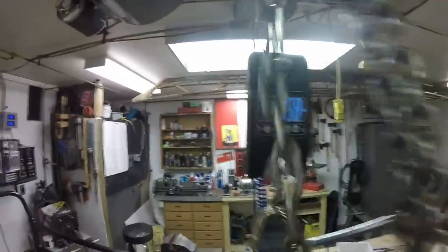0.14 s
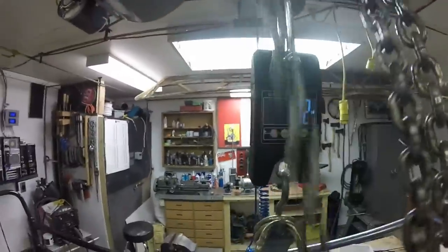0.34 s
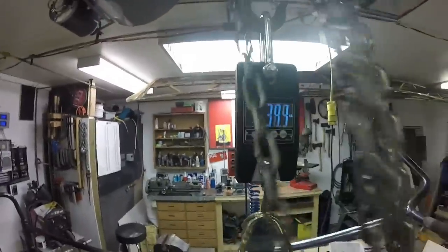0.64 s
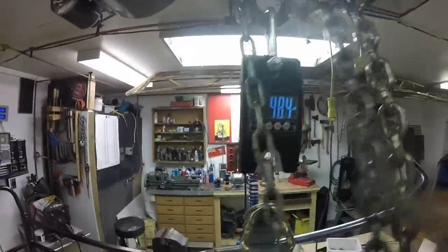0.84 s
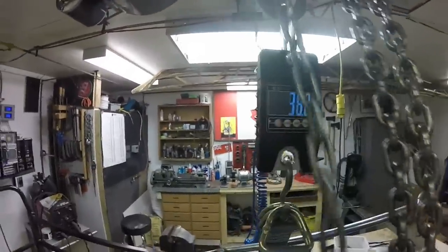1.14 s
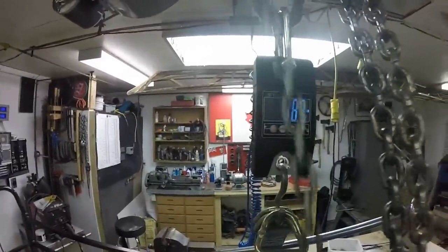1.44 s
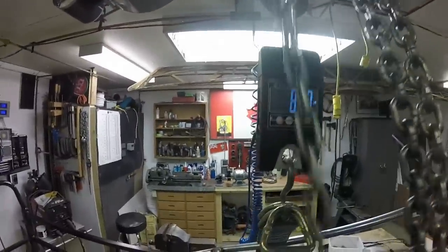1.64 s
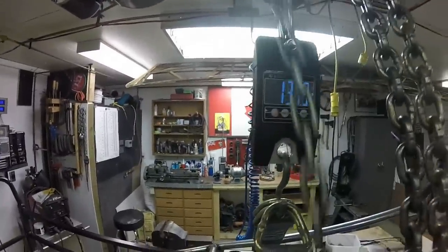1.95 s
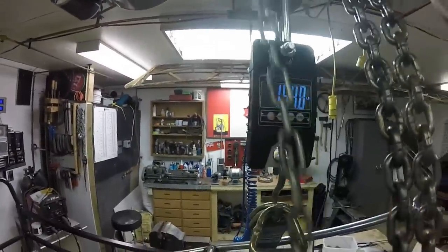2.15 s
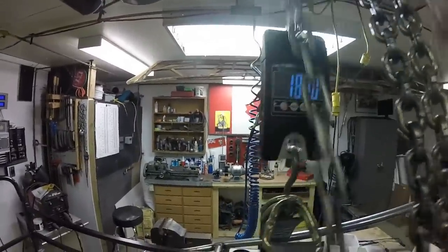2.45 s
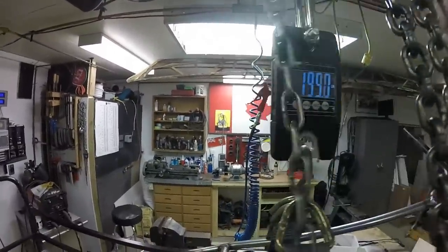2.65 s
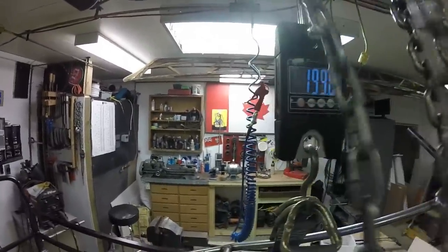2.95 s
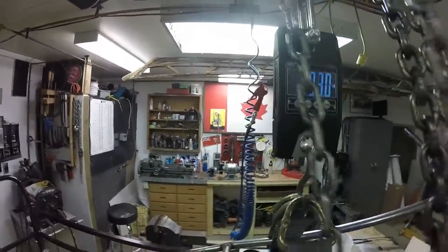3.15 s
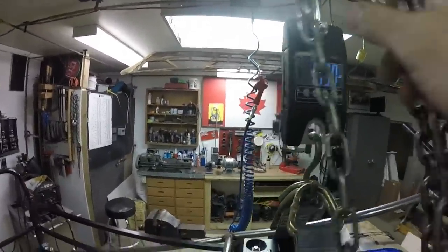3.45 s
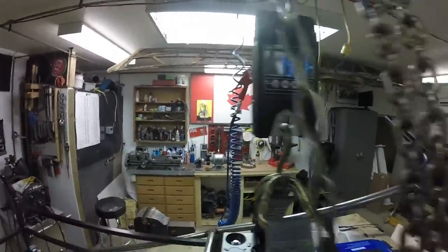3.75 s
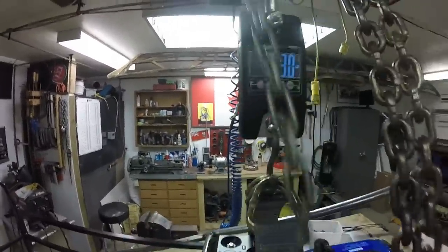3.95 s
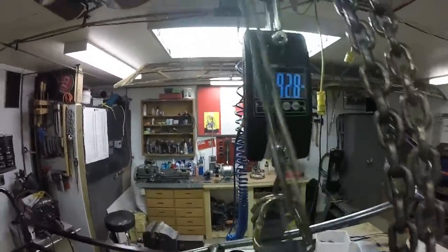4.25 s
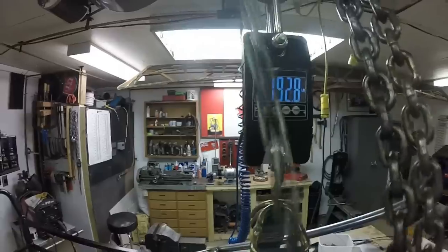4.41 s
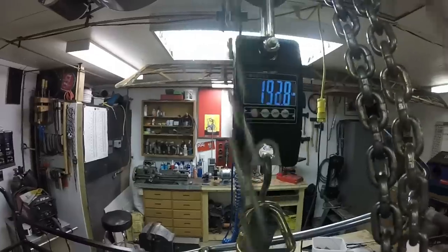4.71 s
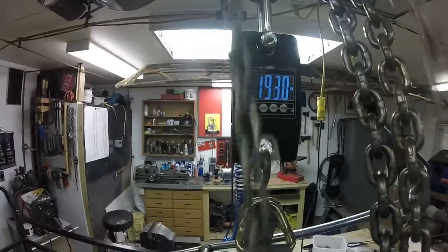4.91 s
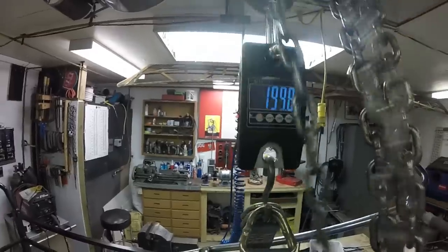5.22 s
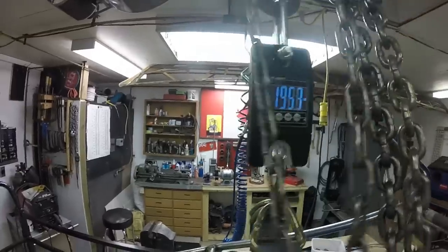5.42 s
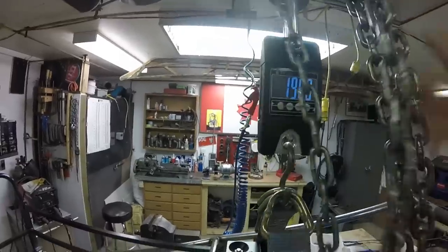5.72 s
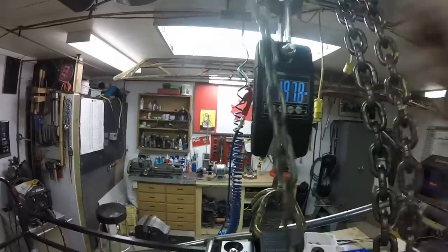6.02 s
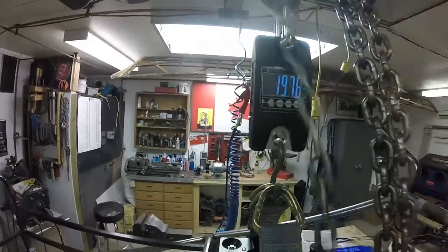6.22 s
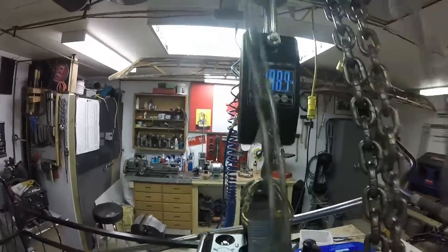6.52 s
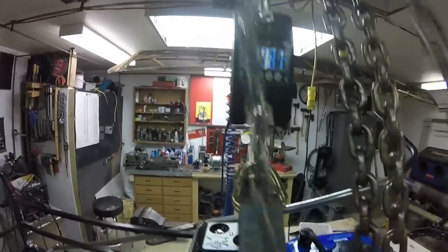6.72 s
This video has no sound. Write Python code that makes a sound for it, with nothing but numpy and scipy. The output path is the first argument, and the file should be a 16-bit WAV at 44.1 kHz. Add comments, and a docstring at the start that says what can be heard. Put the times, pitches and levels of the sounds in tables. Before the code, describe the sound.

Close metallic chain hoist clatter in a small workshop: four rapid ratcheting pulls with rattling, squeaky links, separated by duller clanks and thin chain clinks.

```python
"""A hand chain hoist in a small workshop, with the microphone riding on its rigging.
First the swinging load and chain clank further off, ringing through the room, and slack links clink.
Then come four pulls, with more clanks and clinks between them; the last pull runs to the end.
In each pull the wheel's speed sets the pace: noise bursts through the housing's resonances make the pawl snap at
every tooth and the links knock, gliding tones make them squeak, and random small contacts rattle."""
import sys
import numpy as np
from scipy import signal
from scipy.fft import rfft, irfft
from scipy.io import wavfile
from scipy.ndimage import uniform_filter1d

SR = 44100
rng = np.random.default_rng(int(sys.argv[2]) if len(sys.argv) > 2 else 0)


def int16_out(signal):
    """Quantize to a 16-bit WAV file."""
    q = np.round(np.clip(np.atleast_2d(signal).T, -1, 1) * 32767)
    wavfile.write(sys.argv[1], SR, q.astype(np.int16))


N = 302967
# time axes in seconds: one blow, and the long tails
HIT_T = np.arange(4096) / SR
LONG_T = np.arange(32768) / SR


def amp(db):
    """Decibels to gain."""
    return 10 ** (np.asarray(db) / 20)


def rms(x):
    """Root mean square."""
    return np.sqrt(np.mean(x ** 2) + 1e-20)


def read(points, hz):
    """Reads a table over frequency, interpolated on a log-frequency axis."""
    f, value = np.transpose(points)
    return np.interp(np.log(hz + 1), np.log(f + 1), value)


def fade(t, t60):
    """Exponential decay by 60 dB in t60 seconds."""
    return np.exp(-np.log(1000) * t / t60)


def add(mix, s, sound):
    """Lays a sound into the mix at time s."""
    part = mix[max(round(s * SR), 0):][:len(sound)]
    part += sound[:len(part)]


def band(x, lo_hz, hi_hz):
    """Band-pass filter."""
    return signal.sosfilt(signal.butter(4, [lo_hz, hi_hz], "band", fs=SR, output="sos"), x)


def colour(points, tilt_db=0):
    """Minimum-phase impulse response with the given spectrum, tilted about 1 kHz in dB per octave."""
    hz = abs(np.fft.fftfreq(len(HIT_T), 1 / SR))
    octaves = np.log2(np.maximum(hz, 300) / 1000)  # the tilt stops below 300 Hz
    log_gain = np.log(amp(read(points, hz) + tilt_db * octaves))
    spectrum = np.exp(np.conj(signal.hilbert(log_gain)))
    return np.fft.ifft(spectrum).real


def body(points, modes, t, tilt_db=0):
    """Impulse response of a metal part: a broad colour with resonances standing out of it."""
    ring = np.zeros(len(t))
    for hz, width, db in modes:
        decay = np.exp(-np.pi * width * t)  # a wide resonance dies sooner
        ring += amp(db) * 2 * np.pi * width / SR * decay * np.cos(2 * np.pi * hz * t)
    ring[0] += 1  # the direct blow
    return signal.fftconvolve(ring, colour(points, tilt_db))[:len(t)]


# Low, steady spectrum of the workshop. Each row: frequency in Hz, relative level in dB.
ROOM_TONE_COLOUR = [(20, -19), (50, -5), (75, 6.5), (100, 9.5), (130, -12), (190, 8.5), (320, -1.5),
                    (800, -14.5), (2000, -6), (5000, -113), (10000, -85), (16000, -50)]


def room_tone(level_db=-46):
    """Low, steady rumble of the workshop: noise shaped by a fixed spectrum."""
    gain = amp(read(ROOM_TONE_COLOUR, np.fft.rfftfreq(N, 1 / SR)))
    sound = irfft(rfft(rng.standard_normal(N)) * gain, N)
    return amp(level_db) * sound / rms(sound)


# Reverberation of the workshop. Each row: frequency in Hz, decay time t60 in seconds.
WORKSHOP_DECAY = [(150, 0.98), (500, 0.55), (1500, 0.42), (4000, 0.39), (8000, 0.36), (15000, 0.24)]


def room_tail(build=0.0022):
    """Dense reflections of unit energy that build up within milliseconds; the treble dies first."""
    hz, t, z = signal.stft(rng.standard_normal(len(LONG_T)), SR, nperseg=256)
    decay = fade(t, read(WORKSHOP_DECAY, hz)[:, None])
    tail = signal.istft(z * decay, SR, nperseg=256)[1][:len(LONG_T)]
    tail *= 1 - np.exp(-LONG_T / build)
    return tail / np.linalg.norm(tail)


def reverberate(x, count=6, turns_per_s=8):
    """The hoist swings, so its path through the room keeps changing: several tails take turns."""
    turn = np.arange(N) / SR * turns_per_s
    out = np.zeros(N)
    for k in range(count):
        # neighbouring tails cross-fade at equal power
        share = np.sqrt(np.maximum(1 - abs((turn - k) % count - 1), 0))
        out += signal.fftconvolve(x * share, room_tail())[:N]
    return out


def far_blow(response, t60, direct_db):
    """A body struck some way off: a short crack, then the room; unit level over the first 10 ms."""
    crack, path = rng.standard_normal(len(HIT_T)) * fade(HIT_T, t60), room_tail()
    add(path, 0, amp(direct_db) * crack / np.linalg.norm(crack))
    sound = signal.fftconvolve(path, response)
    return sound / rms(sound[:SR // 100])


# Heavy metal knocks of the load and its chain.
# Each row: time in seconds, relative level in dB, brightness in dB per octave.
LOAD_KNOCKS = [(.112, -21, -1), (.162, -27.5, -0.5), (0.242, -25.5, -2), (0.285, -22.5, 1.5),
               (1.068, -17, 0), (1.123, -16.5, 0), (3.006, -33.5, 2.5), (3.045, -27, 1), (3.124, -21.5, -1),
               (3.14, -18, 0.5), (3.160, -18, 0), (3.475, -38.5, -3.5), (5.277, -28, 0.5),
               (5.344, -22.5, 7), (5.388, -29.5, -3.5), (5.537, -33, 4.5), (5.551, -15, -1.5),
               (5.565, -15, 1.5), (5.635, -21, -1.5), (5.956, -33.5, -2.5), (6.260, -24, -2)]
# Broad colour of a heavy knock. Each row: frequency in Hz, relative level in dB.
KNOCK_COLOUR = [(25, -57), (70, -41), (130, -32), (200, -9.5), (350, -5.5), (600, -4), (1250, 1.5),
                (2200, -3), (4000, -7.5), (7000, -13), (10000, -20), (15000, -30.5), (16500, -74)]


def clanks():
    """The load's frame is knocked: each blow sends a crash of noise through the room."""
    out = np.zeros(N)
    for s, db, tilt_db in LOAD_KNOCKS:
        add(out, s, amp(db) * far_blow(colour(KNOCK_COLOUR, tilt_db), t60=0.072, direct_db=-7))
    return out


# Low, long modes of the load's frame.
# Each row: frequency in Hz, relative level in dB, decay time t60 in seconds.
FRAME_MODES = [(186, -8.5, 0.54), (255.6, -17.5, 0.29), (437, -10.5, 0.32), (503, -10, 0.55),
               (557, -20, 0.45), (647, -8.5, 0.42), (783, -7, 0.38), (1210, -6, 0.23), (1282, -7.5, 0.5),
               (1570, -19, 0.31), (1880, -23, 0.37), (2130, -20, 0.39)]


def frame_ring(build=0.014):
    """Every knock feeds energy into the modes of the frame, which swell and ring on."""
    out, t = np.zeros(N), np.arange(N) / SR
    for hz, mode_db, t60 in FRAME_MODES:
        energy = np.zeros(N)
        swell = fade(LONG_T, t60) * (1 - np.exp(-LONG_T / build))
        for s, db, tilt_db in LOAD_KNOCKS:
            knock_db = db + mode_db + tilt_db * np.log2(hz / 1000)
            add(energy, s, (amp(knock_db) * swell) ** 2)
        out += np.sqrt(energy) * np.sin(2 * np.pi * (hz * t + rng.random()))
    return out


# Slack links clink together. Each row: time in seconds, relative level in dB.
LINK_TOUCHES = [(0.062, -28), (.260, -19), (.931, -27), (2.844, -31.5), (2.969, -39), (3.025, -26),
                (3.04, -32), (3.551, -34), (5.285, -24.5), (5.308, -22), (5.344, -22.5), (5.489, -33),
                (5.868, -44.5), (6.085, -42.5), (6.168, -28), (6.178, -38)]
# Free ringing of a chain link. Each row: frequency in Hz, width in Hz, relative level in dB.
LINK_MODES = [(2870, 36, 1), (4280, 73, 5), (8930, 59, 17), (10700, 170, 10), (11730, 80, 14),
              (12500, 150, -2)]
# Broad colour of a clink. Each row: frequency in Hz, relative level in dB.
TOUCH_COLOUR = [(30, -68), (120, -34), (500, -1.5), (1500, 0.5), (4000, 2.5), (7000, 0), (10000, -12),
                (12000, -6), (15000, -11), (16500, -37)]


def clinks():
    """Light, thin touches of the hanging chain: short cracks that set a free link ringing."""
    out, link = np.zeros(N), body(TOUCH_COLOUR, LINK_MODES, HIT_T)
    for s, db in LINK_TOUCHES:
        add(out, s, amp(db) * far_blow(link, t60=0.1, direct_db=0.5))
    return out


# Four pulls on the hand chain, one list a pull, each starting on a tooth. Each row: time in seconds,
# wheel speed in ratchet teeth per second, relative level of the pawl's snap in dB (6.2 to 15.5 kHz).
WHEEL_PULLS = [
    [(.269, 18.5, -14.5), (.42, 40.04, -16), (.444, 37.06, -15), (.534, 45.68, -16.5), (.633, 31.03, -19.5),
     (.652, 18.76, -17), (.767, 10.1, -31)],
    [(1.213, 12.63, -14.5), (1.361, 27, -17.5), (1.66, 21.08, -17), (1.86, 15.28, -16),
     (2.091, 26.02, -16.5), (2.233, 14.55, -16.5), (2.316, 14.16, -15.5), (2.451, 24.52, -16),
     (2.548, 28.3, -16), (2.58, 28.2, -17), (2.594, 12.9, -18.5), (2.715, 4.3, -19.5)],
    [(3.923, 9.25, -14.5), (4.151, 33.88, -15), (4.211, 30.74, -16.5), (4.542, 43.77, -18.5),
     (4.775, 26.87, -20), (4.911, 30.27, -17), (4.94, 24.47, -17), (5.005, 27, -17.5), (5.18, 21.12, -20),
     (5.246, 9.8, -34)],
    [(6.219, 16.79, -13.5), (6.29, 20.05, -13.5), (6.536, 38.48, -16.5), (6.601, 33.63, -18),
     (6.636, 39.03, -18.5), (6.87, 33.1, -18)],
]


def passing(pull, first, every):
    """Rows (s, speed, snap dB) at which the wheel has turned by first, first + every, ... teeth."""
    s, speed, db = np.transpose(pull)
    t = np.arange(s[0], s[-1], 1 / SR)
    turned = np.cumsum(np.interp(t, s, speed)) / SR
    at = np.interp(np.arange(first, turned[-1] + .2, every), turned, t)
    return np.transpose([at, np.interp(at, s, speed), np.interp(at, s, db)])


# How hard the hand hauls, one list a pull; a jerk shakes the chain, easing off lets it run quietly.
# Each row: time in seconds, force in dB.
HAUL_FORCE = [
    [(.27, -2.5), (.55, -0.5), (.64, 1), (.69, -7.5), (.77, -8)],
    [(1.21, 0.5), (1.35, 3.5), (1.9, 0.5), (2.1, 3.5), (2.32, -4.5), (2.45, 0), (2.6, 0), (2.72, -6)],
    [(3.92, -7.5), (4.1, 5), (4.27, -0.5), (4.55, -2.5), (4.72, -3), (5.08, -3), (5.18, -22)],
    [(6.22, 1.5), (6.45, 1.5), (6.65, -3), (6.87, -4)],
]
BRISK_TEETH_PER_S = 30  # the wheel's speed in a brisk pull


def chain_db(law, s, speed):
    """The faster the chain runs and the harder it is hauled, the harder its links meet."""
    brisk_db, per_octave, follows = law
    force_db = np.interp(s, *np.vstack(HAUL_FORCE).T)
    return brisk_db + per_octave * np.log2(speed / BRISK_TEETH_PER_S) + follows * force_db


# How far into each pull the first link bends onto the wheel. One value a pull: turn in teeth.
FIRST_BEND_TEETH = [1.35, 2.05, .66, 1.3]
TEETH_PER_LINK = 2.571  # the ratchet turns this far while one link of the chain passes


def chain_events(lag, every, law, jitter_s, spread_db):
    """Rows (s, dB) of something that recurs as the chain feeds over the wheel, never quite evenly."""
    starts = zip(WHEEL_PULLS, FIRST_BEND_TEETH)
    rows = [passing(pull, (first + lag) % every, every) for pull, first in starts]
    s, speed, _ = np.vstack(rows).T
    late, hard = rng.standard_normal((2, len(s)))
    return np.transpose([s + jitter_s * late, chain_db(law, s, speed) + spread_db * hard])


# The slack chain sways and rustles. Each row: start in seconds, length in seconds, relative level in dB.
CHAIN_SWAYS = [(-.1, 0.24, -31), (0.596, 0.49, -38), (2.547, 0.54, -37.5), (3.45, 0.77, -31.5),
               (5.227, 0.34, -31), (5.95, 0.43, -42)]
# Loudness of the rattle. The row: relative level in dB at brisk speed, rise in dB per doubling of speed,
# share of the hauling force that it follows [ratio].
RUNNING_RATTLE = (-27.5, 2.1, 1)


def chain_motion(rest_db=-47):
    """Strength of the rattle: running follows wheel speed and haul, swaying swells and sinks above a floor."""
    t = np.arange(N) / SR
    running, swaying = np.zeros(N), np.full(N, amp(rest_db))
    for pull in WHEEL_PULLS:
        s, speed, _ = np.transpose(pull)
        hauled = (s[0] < t) * (t < s[-1])
        running += hauled * amp(chain_db(RUNNING_RATTLE, t, np.interp(t, s, speed)))
    for s, length, db in CHAIN_SWAYS:
        swaying += amp(db) * abs(np.sin(np.pi * np.clip((t - s) / length, 0, 1)))
    return uniform_filter1d(running, size=2048), swaying


def contacts(per_s, spread_db):
    """A random train of small impacts of uneven size and either sign."""
    size = amp(spread_db * np.minimum(rng.exponential(1, N), 2.5))
    return (rng.random(N) < per_s / SR) * rng.choice([-1, 1], N) * size


# Broad colour of the rattle heard through the room. Each row: frequency in Hz, relative level in dB.
RATTLE_SPECTRUM = [(60, -7.5), (200, -5.5), (400, -2), (1000, 3), (1700, -5.5), (2100, -1.5), (2700, -16),
                   (3400, -2), (5000, -9), (8000, -26), (11500, -29.5), (15000, -28), (16500, -24)]
# Broad colour of link blows and guide ticks. Each row: frequency in Hz, relative level in dB.
LINK_SPECTRUM = [(100, -20.5), (450, -9.5), (900, 4.5), (1500, 1.5), (2100, -2.5), (3000, -0.5), (4000, -5),
                 (6000, -11.5), (8500, -20.5), (11500, -19.5), (16000, -44)]
# Resonances of the hoist housing and wheel. Each row: frequency in Hz, width in Hz, relative level in dB.
HOIST_MODES = [(897, 54, 5), (1038, 23, 4.5), (1629, 66, 14.5), (1716, 29, 6), (2423, 77, 4.5),
               (2536, 83, 15.5), (2608, 15.6, 21), (3097, 27, 5.5), (4294, 140, 9), (4607, 38, 10),
               (5140, 41, 15), (5553, 24.5, 19.5), (6600, 98, -12), (6830, 54, 12), (7210, 83, 4),
               (9420, 200, -1), (11350, 55, 11), (11400, 160, -4), (13160, 41, 11), (14100, 76, 5)]


def rattle(air_db=-6, guide_db=-6, slack_guide_db=-5):
    """Small contacts: some blurred through the room, some tick on the chain guide, less so when it hangs slack."""
    touches = signal.fftconvolve(contacts(per_s=360, spread_db=5.5), colour(RATTLE_SPECTRUM))[:N]
    air = amp(-9.5) * touches + reverberate(touches)
    slip_level = signal.fftconvolve(contacts(per_s=300, spread_db=8.5), fade(HIT_T, 0.017))[:N]
    slips = slip_level * rng.standard_normal(N)
    guide = signal.fftconvolve(slips, body(LINK_SPECTRUM, HOIST_MODES, HIT_T, tilt_db=2.5))[:N]
    running, swaying = chain_motion()
    air_level = np.hypot(running, swaying) * amp(air_db)
    guide_level = np.hypot(running, amp(slack_guide_db) * swaying) * amp(guide_db)
    return air_level * air / rms(air) + guide_level * guide / rms(guide)


def housing(points, scatter, count=16):
    """Responses of the hoist; its resonances shift a little as the chain's hold on the wheel changes."""
    hz, width, db = np.transpose(HOIST_MODES)
    shifts = scatter * width * rng.standard_normal((count, len(HOIST_MODES)))
    return np.array([body(points, zip(hz + shift, width, db), HIT_T) for shift in shifts])


def blows(count, rise, snap_db, hold, after_db, after_t60, alike):
    """Steel snaps on steel, chatters for some milliseconds and dies away; part of the pattern repeats."""
    chatter = rng.standard_normal((count + 1, len(HIT_T)))
    # row 0 is the part that all blows share
    chatter = np.sqrt(alike) * chatter[0] + np.sqrt(1 - alike) * chatter[1:]
    snap = amp(snap_db) * np.exp(-(HIT_T / .0016) ** 2)
    envelope = snap + np.exp(-(HIT_T / hold) ** 2) + amp(after_db) * fade(HIT_T, after_t60)
    return chatter * (1 - np.exp(-HIT_T / rise)) * envelope


def strike(rows, force, points, lo_hz, hi_hz, scatter, air_db):
    """Each blow rings the housing (levelled in a band over 10 ms) and sends a plainer crack into the room."""
    responses = housing(points, scatter)
    chosen = responses[rng.integers(0, len(responses), len(rows))]
    rings = signal.fftconvolve(force, chosen, axes=1)
    cracks = signal.fftconvolve(force, colour(points)[None], axes=1)
    heads = band(rings[:, :SR // 100], lo_hz, hi_hz)
    near, air = np.zeros((2, N))
    for (s, db), ring, crack, head in zip(rows, rings, cracks, heads):
        gain = amp(db) / rms(head)
        add(near, s, gain * ring)
        add(air, s, gain * crack)
    return near + amp(air_db) * reverberate(air + near / 3)


# Further link knocks, set one by one: the hardest within the pulls and some between them. Each row: time in
# seconds, relative level in dB (750 to 2900 Hz).
EXTRA_KNOCKS = [(.244, -21.5), (.259, -22.5), (.362, -18.5), (.387, -25.5), (.459, -19.5), (.51, -23),
                (.553, -21.5), (.775, -29), (.956, -31), (1.277, -22.5), (1.325, -23), (1.466, -20.5),
                (1.704, -24.5), (1.978, -29), (2.225, -23), (2.234, -21), (2.269, -23), (2.389, -23),
                (2.42, -24), (2.687, -31), (2.715, -20), (2.937, -31), (3.704, -32), (3.779, -31.5),
                (3.883, -30.5), (4.025, -20), (4.198, -26), (4.357, -21), (4.487, -19.5), (4.55, -26),
                (4.884, -24), (5.062, -23), (5.084, -19), (5.246, -35), (6.186, -20), (6.2, -21),
                (6.208, -19.5), (6.233, -21), (6.338, -19.5), (6.425, -18.5), (6.435, -18.5), (6.526, -23.5),
                (6.713, -22.5)]
# Loudness of a link dropping into its pocket. The row: relative level in dB at brisk speed,
# rise in dB per doubling of speed, share of the hauling force that it follows [ratio].
POCKET_KNOCK = (-25, 3.8, 0.34)
# Loudness of neighbouring links bumping. The row: relative level in dB at brisk speed,
# rise in dB per doubling of speed, share of the hauling force that it follows [ratio].
LINK_BUMP = (-29, 2.8, 1)
SEAT_LAG_TEETH = 1.05  # a link drops into its pocket this long after it bends
JOSTLE_EVERY_TEETH = 1.3  # neighbouring links bump one another about this often


def links(air_db=-7):
    """Links seat, jostle and knock: softer, duller blows that bring out the housing's low resonances."""
    seats = chain_events(SEAT_LAG_TEETH, TEETH_PER_LINK, POCKET_KNOCK, jitter_s=.003, spread_db=5.5)
    jostles = chain_events(0, JOSTLE_EVERY_TEETH, LINK_BUMP, jitter_s=.012, spread_db=0.0)
    rows = [*EXTRA_KNOCKS, *seats, *jostles]
    force = blows(count=len(rows), rise=0.0007, snap_db=0.5, hold=0.0073,
                  after_db=-6.5, after_t60=.07, alike=0.068)
    return strike(rows, force, LINK_SPECTRUM, 750, 2900, scatter=.35, air_db=air_db)


# Further squeaks of links, set one by one: louder ones within the pulls and strays between them. Each row: time
# in seconds, relative level in dB.
EXTRA_SQUEAKS = [(.038, -18), (.182, -21.5), (.075, -28), (.318, -16), (.448, -15), (.547, -12), (.791, -29),
                 (1.064, -23), (1.11, -22), (1.188, -27), (2.167, -18), (2.331, -17), (2.91, -28),
                 (3.007, -29), (3.612, -28.5), (3.707, -22), (3.978, -16), (4.424, -14.5), (5.108, -16.5),
                 (5.455, -22), (6.086, -32.5)]
# Loudness of a link's squeak as it bends. The row: relative level in dB at brisk speed,
# rise in dB per doubling of speed, share of the hauling force that it follows [ratio].
BEND_SQUEAK = (-15, 3.5, .3)
SQUEAK_HZ, SQUEAK_SPREAD_HZ = 5107, 89  # pitch of a link's squeak


def squeaks(glide_hz_per_s=25000, waver=0.022, ring_db=-23, ring_t60=0.06):
    """A bending link slips on its neighbour: it sings for a few milliseconds, rising slightly, and grips again."""
    out = np.zeros(N)
    bends = chain_events(0, TEETH_PER_LINK, BEND_SQUEAK, jitter_s=.0015, spread_db=4.5)
    for s, db in [*EXTRA_SQUEAKS, *bends]:
        hz = SQUEAK_HZ + SQUEAK_SPREAD_HZ * rng.standard_normal()
        length = rng.uniform(.003, .0052)
        u = HIT_T / length
        drift = uniform_filter1d(rng.standard_normal(len(u)), size=40)
        glide = glide_hz_per_s * (np.minimum(HIT_T, 2 * length) - length / 2)
        pitch = hz + glide + hz * waver * drift / rms(drift)
        ring = amp(ring_db) * np.minimum(u, 1) * fade(HIT_T, ring_t60)
        swell = np.sqrt(u) * np.exp(-u ** 2) + ring
        tone = np.sin(2 * np.pi * np.cumsum(pitch) / SR)
        add(out, s, amp(db) * np.sqrt(2) * swell / swell.max() * tone)
    return out


# The wheel rocks between pulls and the pawl ticks.
# Each row: time in seconds, relative level in dB (6.2 to 15.5 kHz).
ROCKING_TICKS = [(2.9354, -32.5), (3.701, -42), (6.18, -37)]
# Broad colour of the pawl's blow. Each row: frequency in Hz, relative level in dB.
PAWL_SPECTRUM = [(100, -15.5), (400, -27.5), (900, -5), (2000, -8), (3500, -1), (4800, -1.5), (6100, 0),
                 (6900, 7), (8400, -0.5), (10000, 2.5), (11500, 2), (13200, 0), (15200, -9), (16500, -40)]
PAWL_SNAP_DB = 1  # the pawl's first contact, relative to the chatter that it is added to


def pawl(air_db=-12, spread_db=1.52):
    """The pawl drops behind every tooth: hard, bright snaps carried straight through the housing."""
    s, _, db = np.vstack([passing(pull, 0, 1) for pull in WHEEL_PULLS]).T
    snap_db = db + spread_db * rng.standard_normal(len(s))
    rows = [*zip(s, snap_db), *ROCKING_TICKS]
    force = blows(count=len(rows), rise=0.00073, snap_db=PAWL_SNAP_DB, hold=.0075,
                  after_db=-3.5, after_t60=0.068, alike=0.17)
    return strike(rows, force, PAWL_SPECTRUM, 6200, 15500, scatter=0.66, air_db=air_db)


def scene():
    """The background, the further clanks and clinks, and the near hoist."""
    load = amp(0.67) * clanks() + frame_ring()
    slack = amp(-2.0) * clinks()
    squeak = amp(-1.0) * squeaks()
    squeak_in_room = amp(-6.5) * reverberate(squeak)
    hoist = amp(-1.72) * pawl() + amp(0.88) * links() + squeak + squeak_in_room
    return (room_tone() + load + slack + rattle() + hoist)[None]


def record(dry, ceiling=.85, edge_hz=16300):
    """The highest peaks are rounded off; then a low-pass sets the band limit."""
    rounded = dry / (1 + (abs(dry) / ceiling) ** 6) ** (1 / 6)
    low_pass = signal.firwin(255, edge_hz, window=("kaiser", 8), fs=SR)
    return signal.oaconvolve(rounded, low_pass[None], "same")


dry = scene()
out = record(dry)
int16_out(out)
```